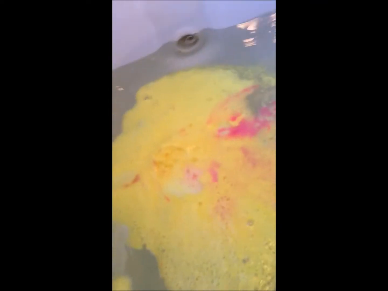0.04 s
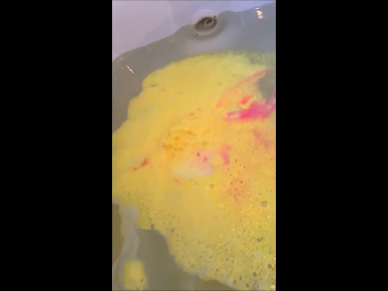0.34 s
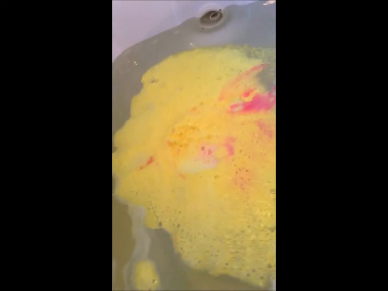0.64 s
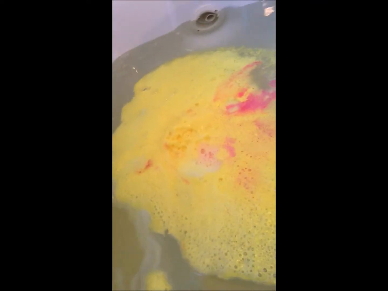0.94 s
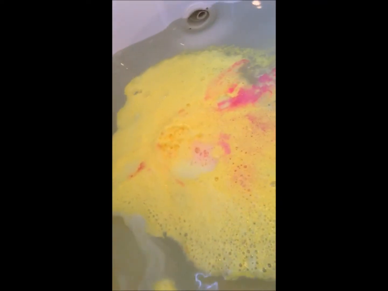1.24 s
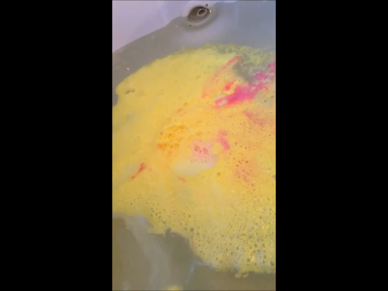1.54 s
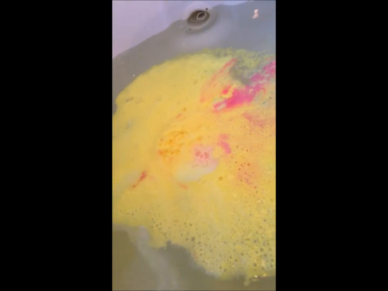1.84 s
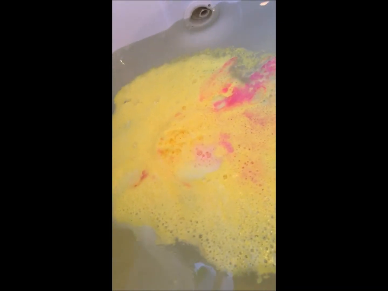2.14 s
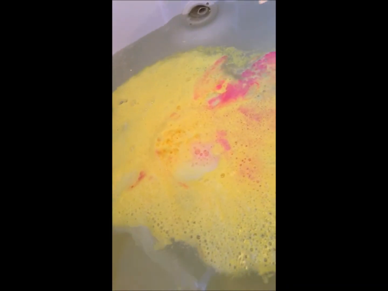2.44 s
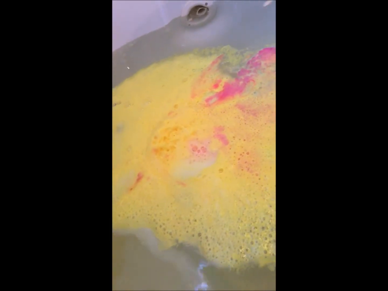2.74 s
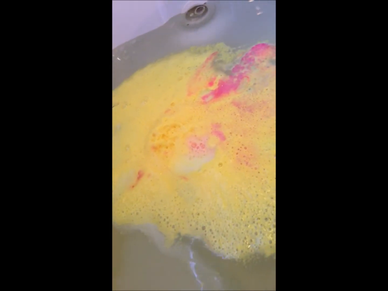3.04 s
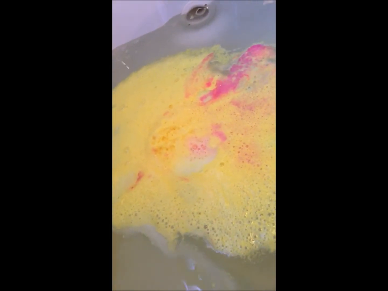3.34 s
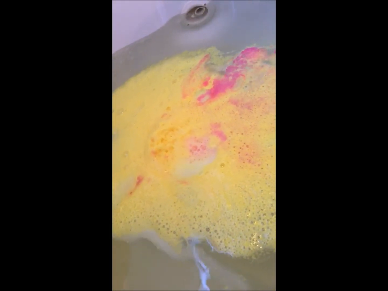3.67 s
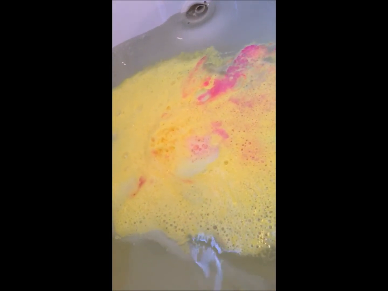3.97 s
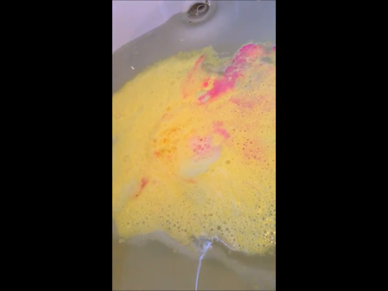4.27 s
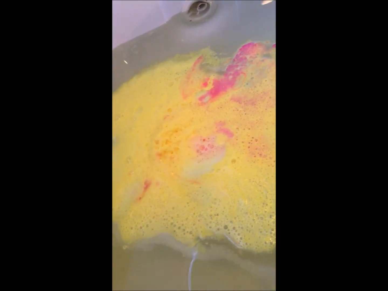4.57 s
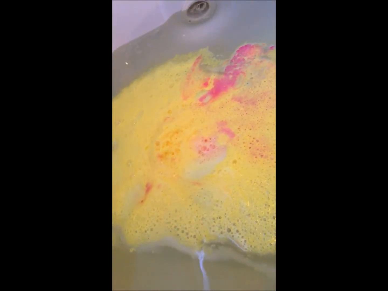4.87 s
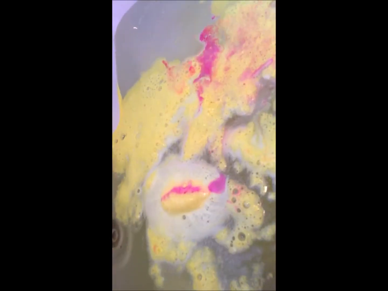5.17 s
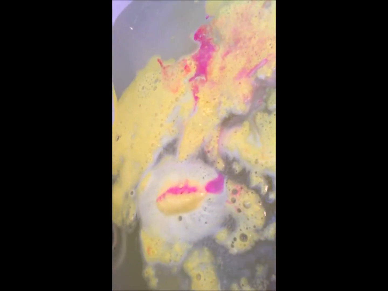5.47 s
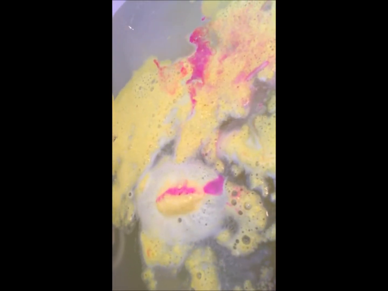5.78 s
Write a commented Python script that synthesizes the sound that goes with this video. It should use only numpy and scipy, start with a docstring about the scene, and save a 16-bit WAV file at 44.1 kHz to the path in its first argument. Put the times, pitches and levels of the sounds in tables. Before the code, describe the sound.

A bath bomb fizzes faintly under foam in a quiet bathroom, a soft hiss dotted with tiny bubble ticks. A low building rumble and a fan hum lie beneath, with an occasional dull bump of water against the tub. After about five seconds the sound drops out for a moment, then returns with a sharp pop and louder fizzing. The microphone is just above the water.

```python
"""Bath bomb fizzing

In a quiet bathroom, countless tiny bubbles burst under foam and sum to a soft hiss that slowly calms.
Larger bubbles tick, gas spurts and a droplet pings. Water laps, the tub's modes ring in dull bumps,
the building rumbles and a fan hums. The sound drops out twice, first briefly, then for a moment;
it returns with a pop, louder now that the bomb fizzes in open water."""
import sys
import numpy as np
from scipy import signal
from scipy.fft import rfft, irfft
from scipy.io import wavfile
from scipy.ndimage import uniform_filter1d

SR = 44100
rng = np.random.default_rng(int(sys.argv[2]) if len(sys.argv) > 2 else 0)


def bounce(signal):
    """Save signal as a 16-bit WAV file at the path given by the first command-line argument."""
    frames = np.transpose(np.atleast_2d(signal))
    limited = np.clip(frames, -1, 1)
    pcm = np.round(limited * 32767).astype(np.int16)
    wavfile.write(sys.argv[1], SR, pcm)


N = 256220
TIME = np.arange(N) / SR
FREQ = np.maximum(np.arange(N // 2 + 1) * SR / N, 1)
OPEN_WATER_S = 5.19083

# hiss under foam: (frequency [Hz], relative spectral density [dB])
FOAM_SPECTRUM = [(250, 4), (500, 2.5), (700, 2.5), (1100, 2), (2000, 0), (4000, -1), (6000, -1.33),
                 (7700, -2), (9500, 0), (13000, 0.2), (16000, 0)]
# hiss in open water: (frequency [Hz], relative spectral density [dB])
OPEN_WATER_SPECTRUM = [(250, 5.5), (600, 1), (1500, 0.5), (3000, -0.5), (6000, -1.7), (7700, -4),
                       (8700, -3), (11000, -3.5), (13000, -3), (16000, -4)]
# brief dips of the hiss: (time [s], depth [dB])
HISS_DIPS = [(.062, 7), (.767, 12), (1.768, 6.5), (2.602, 7.5), (2.687, 12), (2.704, 10.5), (2.942, 7.5),
             (3.39, 4), (3.581, 7), (3.882, 6.5), (3.923, 4.5), (4.861, 11)]
# the clearest single bursts: (time [s], level [dB], frequency [Hz], bandwidth [Hz])
BUBBLE_TICKS = [(.111, -62, 2650, 1200), (.1445, -52, 5900, 1090), (.157, -62, 5800, 900),
                (.374, -61, 12000, 3500), (.380, -57.5, 11000, 3500), (.394, -58, 3400, 2000),
                (.403, -58, 7500, 7000), (.724, -59, 12500, 4000), (.841, -60, 6000, 9000),
                (.945, -65, 3200, 2500), (.975, -59, 8600, 3000), (1.001, -66, 9500, 3000),
                (1.331, -62, 7500, 3000), (2.488, -57, 12500, 4500), (3.414, -64, 4000, 4500),
                (4.266, -60.5, 8600, 6500), (5.445, -53, 15000, 2000)]
# escaping gas: (time [s], level [dB], frequency [Hz], bandwidth [Hz], T60 [s])
GAS_SPURTS = [(.104, -66.5, 6500, 1500, 0.13), (.154, -72, 6200, 1200, 0.1),
              (.56, -66.5, 9000, 10000, 0.25), (.604, -62, 9500, 11000, 0.25),
              (.94, -68, 5000, 10050, 0.17), (5.228, -60, 7000, 10000, .06), (5.535, -63, 8000, 10000, .06),
              (5.672, -57, 5000, 9000, .06)]
# one droplet: (time [s], level [dB], starting frequency [Hz], T60 [s])
DROPLET_PING = (.110, -62.5, 2880, .155)
# water against the tub: (time [s], level [dB], frequency [Hz])
WATER_LAPS = [(.54, -68, 245), (1.93, -70.5, 370), (5.55, -61, 280)]
# bumps of water and tub: (time [s], drive level [dB], most excited frequency [Hz], rise time [s])
TUB_BUMPS = [(1.935, -66.5, 320, 0.031), (2.40, -74, 285, 0.026), (2.78, -51, 183, 0.015),
             (5.563, -65, 252, 0.018)]
# modes of the filled tub: (frequency [Hz], gain [dB])
TUB_RESONANCES = [(183, 0), (234, -1.5), (302, 1.5), (340, -2.5)]
# rumble of the building: (frequency [Hz], relative spectral density [dB])
RUMBLE_SPECTRUM = [(12, -17), (25, -7), (36, -8), (47, 6.5), (57, 0.5), (72, -9.5), (86, -18), (105, -17),
                   (140, -45.5), (250, -75)]
# swells of the rumble's deep part: (time [s], gain [dB])
RUMBLE_SWELLS = [(0.0, -47), (0.12, -46.5), (0.22, -45.5), (0.36, -46), (0.45, -55.5), (0.54, -47),
                 (0.83, -47), (0.89, -56.5), (0.97, -47), (1.56, -52.5), (1.68, -45.5), (1.9, -54.5),
                 (2.52, -50), (2.72, -64), (2.8, -49.5), (3.3, -49.5), (3.9, -53), (4.12, -47),
                 (4.36, -53.5), (4.48, -41.5), (4.64, -52.5), (4.8, -38), (4.9, -51), (5.0, -44)]
# air noise of the fan: (frequency [Hz], relative spectral density [dB])
FAN_SPECTRUM = [(50, -23), (85, 3.5), (105, 0.5), (140, -6.5), (180, -11), (235, -14), (270, -21),
                (340, -23), (480, -32), (900, -63.5)]
# hum of the fan motor: (frequency [Hz], level [dB])
MOTOR_LINES = [(120, -63), (299.5, -88.5)]
# gaps in the sound: (start [s], end [s], depth [dB])
SOUND_GAPS = [(2.734, 2.769, 30), (5.01, 5.19, 70)]
# hollows in the microphone's response: (frequency [Hz], Gaussian width [Hz], depth [dB])
MIC_HOLLOWS = [(4920, 190, 3), (10410, 230, 4.5)]


def fizz(foam_db=-65.5, fresh_db=0.96, calm_s=1.1, open_db=-57):
    """Superposition: countless bursts merge into hiss, calming under foam and louder in open water."""
    grains = bubbles(per_second=9000, scatter_db=2, t60_cycles=5)
    foam_gain = undb(foam_db + fresh_db * np.exp(-TIME / calm_s))
    foam = hiss(FOAM_SPECTRUM, grains, flicker_db=0.65) * foam_gain
    water = hiss(OPEN_WATER_SPECTRUM, grains, flicker_db=0.4) * undb(open_db)
    return np.where(TIME > OPEN_WATER_S, water, foam) * dips()


def bubbles(per_second, scatter_db, t60_cycles, size_classes=14):
    """Damped oscillators struck at random: each bubble rings briefly; small, high ones are commonest."""
    pitches = np.geomspace(1200, 15000, size_classes)
    out = np.zeros(N)
    for hz in pitches:
        bursts = rng.random(N) < per_second * hz / pitches.sum() / SR
        strength = undb(scatter_db * np.minimum(rng.exponential(size=N), 5)) * rng.choice([-1, 1], N)
        pole = np.exp((2j * np.pi - np.log(1000) / t60_cycles) * hz / SR)
        ringing = signal.lfilter([1], [1, -pole], bursts * strength).imag
        out += np.sqrt(hz) * unit(ringing)
    return unit(out)


def hiss(spectrum, grains, flicker_db, grain_db=-5.5):
    """Faint bursts sum to Gaussian noise, single ones stand out, and the gas flow modulates the level."""
    blend = rng.standard_normal(N) + undb(grain_db) * grains
    return colour(blend, spectrum) * undb(flicker_db * drift(13))


def dips(half_width_s=0.0063):
    """Amplitude modulation: a gain that lowers the hiss briefly at each dip."""
    return undb(-sum(depth / (1 + np.abs((TIME - s) / half_width_s) ** 4) for s, depth in HISS_DIPS))


def ticks(faint_db=-66.5, scatter_db=2.0, low_hz=4000, high_hz=14000, width_hz=7000, count=12):
    """Discrete transients: the clear bursts, plus faint random ones that thin out as the foam calms."""
    faint = [(OPEN_WATER_S * when ** 1.3, faint_db + scatter_db * (2 * size - 1),
              low_hz + (high_hz - low_hz) * pitch, width_hz)
             for when, size, pitch in rng.random((count, 3))]
    return sum(burst(*row) for row in BUBBLE_TICKS + faint)


def burst(start, db, hz, width_hz, tail_db=-22):
    """Cavity resonance: a larger bubble bursts and rings; the tiled walls add faint reverberation."""
    envelope = strike(start, rise_s=0.00028, t60=0.012)
    cavity = resonant_noise(hz, width_hz, order=2)
    ring = unit(cavity * envelope) * np.sqrt(np.mean(envelope ** 2))
    tail = cavity * strike(start, rise_s=0.015, t60=0.25)
    return undb(db) * (ring + undb(tail_db) * tail)


def spurts(rise_s=0.0053):
    """Flow noise: gas escapes in short rushes that decay exponentially."""
    return sum(undb(db) * resonant_noise(hz, width_hz) * strike(start, rise_s, t60)
               for start, db, hz, width_hz, t60 in GAS_SPURTS)


def droplet(sag_hz=230, sag_s=0.026, beat_hz=42, tail_db=-12):
    """Beating of two close modes: a rough ping sinks in pitch and reverberates between the tiles."""
    start, db, hz, t60 = DROPLET_PING
    age = np.maximum(TIME - start, 0)
    pitch = hz - sag_hz * (1 - np.exp(-age / sag_s)) + 45 * drift(260)
    carrier = np.exp(2j * np.pi * np.cumsum(pitch) / SR)
    rough_beat = 1 + .45 * np.exp(2j * np.pi * beat_hz * age) + .3 * drift(400)
    ping = np.sqrt(2) * (rough_beat * carrier).real * strike(start, rise_s=.003, t60=t60)
    tail = resonant_noise(hz=2830, width_hz=300) * strike(start, rise_s=.06, t60=.55)
    return undb(db) * (ping + undb(tail_db) * tail)


def pop(db=-30.5, first_cycle_s=.000104, bend=.234, fade_s=0.047, edge_db=-32, edge_s=.00007):
    """Group delay: the lows of a sharp click arrive late, so it sweeps quickly from treble to bass."""
    age = np.maximum(TIME - OPEN_WATER_S, 0)
    cycles = (age / first_cycle_s) ** bend
    sweep = -undb(db) * np.sin(2 * np.pi * cycles) * np.exp(-(age / fade_s) ** 2)
    edge = undb(edge_db) * np.exp(-((TIME - OPEN_WATER_S) / edge_s - 1) ** 2)
    return sweep + edge


def laps(rise_s=0.036, t60=0.29, relative_width=0.5):
    """Broad resonances excited by noise: water washes softly against the tub."""
    return sum(undb(db) * resonant_noise(hz, relative_width * hz) * strike(start, rise_s, t60)
               for start, db, hz in WATER_LAPS)


def bumps(t60=0.39, wobble_rad=0.59, reach_octaves=0.32):
    """Modal excitation: a bump rings the tub's modes nearest its pitch, unsteadily as the water moves."""
    out = np.zeros(N)
    for hz, mode_db in TUB_RESONANCES:
        drive = np.zeros(N)
        for start, db, centre_hz, rise_s in TUB_BUMPS:
            coupling = np.exp(-.5 * (np.log2(hz / centre_hz) / reach_octaves) ** 2)
            drive += undb(db) * coupling * strike(start, rise_s, t60)
        mode = np.sqrt(2) * np.sin(2 * np.pi * hz * TIME + wobble_rad * drift(50))
        out += undb(mode_db) * drive * mode
    return out


def rumble(steadiness=0.72, flutter_db=1.5, crossover_hz=64, upper_db=-53, open_water_db=-48):
    """Room resonance gathers the building's noise near 50 Hz; its deep part swells and sinks."""
    noise = colour(rng.standard_normal(N), RUMBLE_SPECTRUM)
    envelope = np.sqrt(uniform_filter1d(noise ** 2, SR // 8))
    evened = unit(noise / envelope ** steadiness) * undb(flutter_db * drift(14))
    deep = irfft(rfft(evened) / (1 + (FREQ / crossover_hz) ** 10), N)
    deep_db = np.where(TIME > OPEN_WATER_S, open_water_db, np.interp(TIME, *np.transpose(RUMBLE_SWELLS)))
    return deep * undb(deep_db) + (evened - deep) * undb(upper_db)


def fan(air_db=-60, waver_db=2.5, waver_rad=.2):
    """Moving air gives a continuous spectrum; the motor adds a line spectrum that wavers slightly."""
    air = colour(rng.standard_normal(N), FAN_SPECTRUM) * undb(air_db)
    hum = np.zeros(N)
    for hz, db in MOTOR_LINES:
        amplitude = np.sqrt(2) * undb(db - waver_db * drift(9))
        hum += amplitude * np.sin(2 * np.pi * hz * TIME + waver_rad * drift(2.9))
    return air + hum


def dropouts(return_s, fade_db_per_s=2800):
    """Gating: at each gap the gain falls fast, stays low and recovers over return_s."""
    loss_db = np.zeros(N)
    for start, end, depth in SOUND_GAPS:
        fade_db = np.clip((TIME - start) * fade_db_per_s, 0, depth)
        hold = np.clip(1 - (TIME - end) / return_s, 0, 1) ** 2
        loss_db += fade_db * hold
    return undb(-loss_db)


def strike(start, rise_s, t60):
    """Exponential damping: an envelope rises linearly to 1, then loses 60 dB in t60 seconds."""
    age = np.maximum(TIME - start, 0)
    return np.minimum(age / rise_s, 1) * undb(-60 * np.clip((age - rise_s) / t60, 0, 3))


def resonant_noise(hz, width_hz, order=1):
    """Resonance driven by white noise, at rms 1; order 2 has steeper flanks."""
    detuning = (FREQ ** 2 - hz ** 2) / (FREQ * width_hz)
    return unit(irfft(rfft(rng.standard_normal(N)) / (1 + 1j * detuning) ** order, N))


def colour(x, spectrum):
    """Spectral shaping by (frequency [Hz], gain [dB]) points, at rms 1."""
    hz, db = np.transpose(spectrum)
    gain = undb(np.interp(np.log(FREQ), np.log(hz), db))
    return unit(irfft(rfft(x) * gain, N))


def drift(rate_hz):
    """Low-pass filtering of random steps: a smooth drift with a spread near 1."""
    span = int(SR / rate_hz)
    steps = np.repeat(rng.standard_normal(N // span + 1), span)
    return 1.38 * uniform_filter1d(uniform_filter1d(steps, span), span)[:N]


def undb(db):
    """Amplitude ratio of a level in decibels."""
    return 10 ** (np.asarray(db) / 20)


def unit(x):
    """Normalisation to rms 1."""
    return x / np.sqrt(np.mean(x ** 2))


def scene():
    """Superposition of fizz, tub and room, the same in both ears."""
    treble = fizz() + ticks() + spurts() + droplet()
    bass = laps() + bumps() + rumble() + fan()
    # after a gap the treble snaps back, while the bass eases in
    mono = treble * dropouts(return_s=.0025) + bass * dropouts(return_s=.016) + pop()
    return np.array([mono, mono])


def record(dry, cutoff_hz=15820):
    """Frequency response of the microphone over the tub: two narrow hollows and a steep treble cut."""
    loss_db = sum(depth * np.exp(-.5 * ((FREQ - hz) / width) ** 2) for hz, width, depth in MIC_HOLLOWS)
    heard = irfft(rfft(dry) * undb(-loss_db), N)
    low_pass = signal.ellip(10, .1, 70, cutoff_hz, fs=SR, output="sos")
    return signal.sosfilt(low_pass, heard)


dry = scene()
out = record(dry)
bounce(out)
```